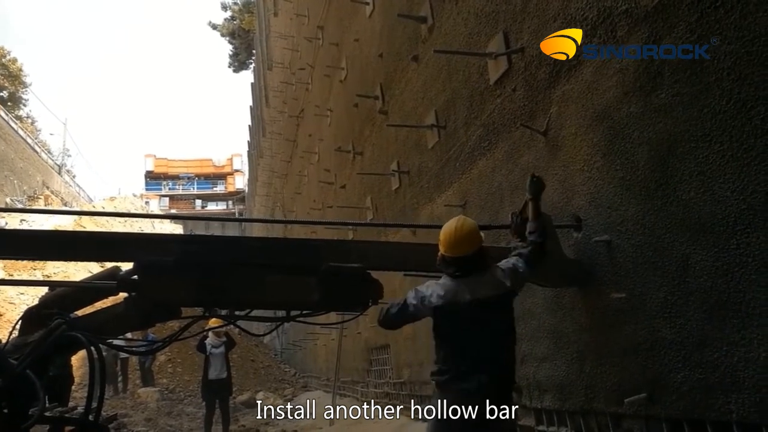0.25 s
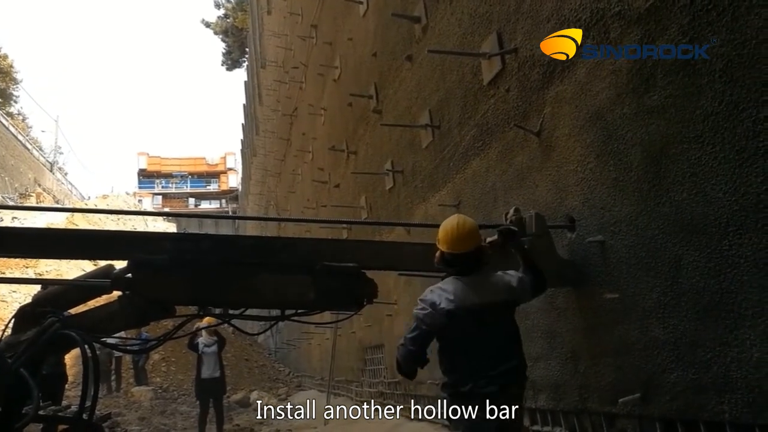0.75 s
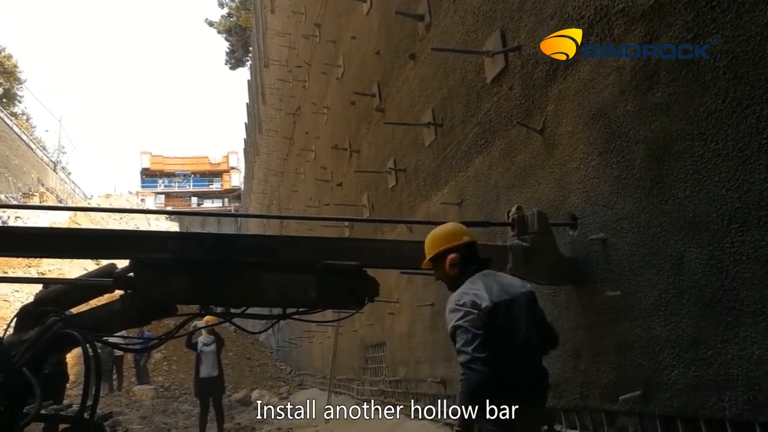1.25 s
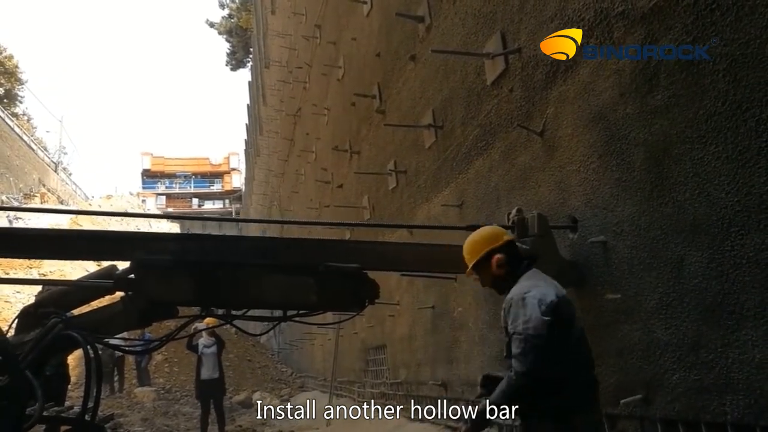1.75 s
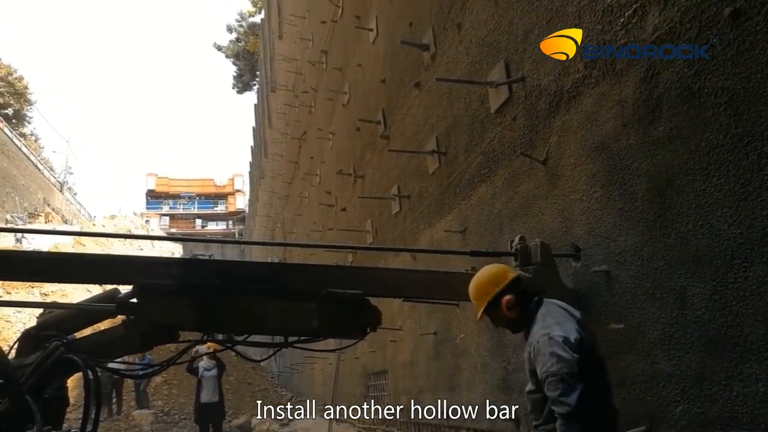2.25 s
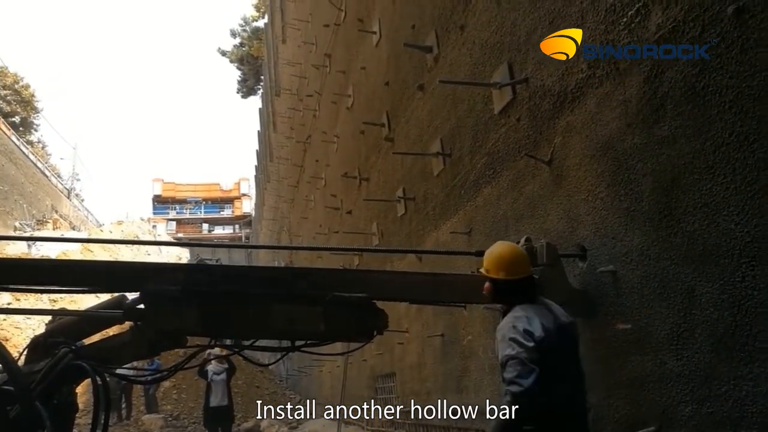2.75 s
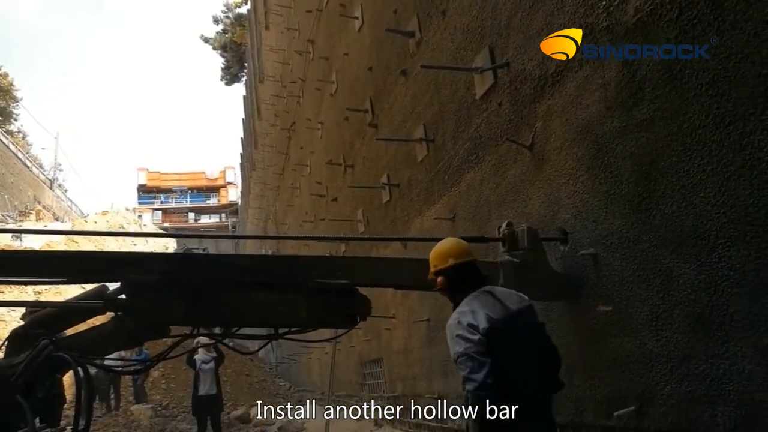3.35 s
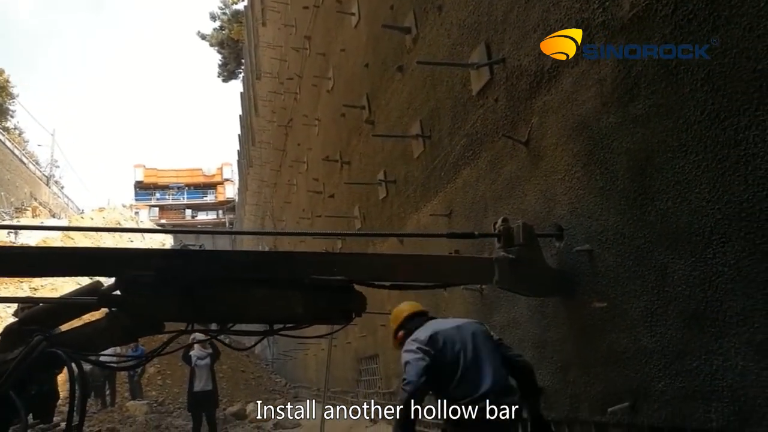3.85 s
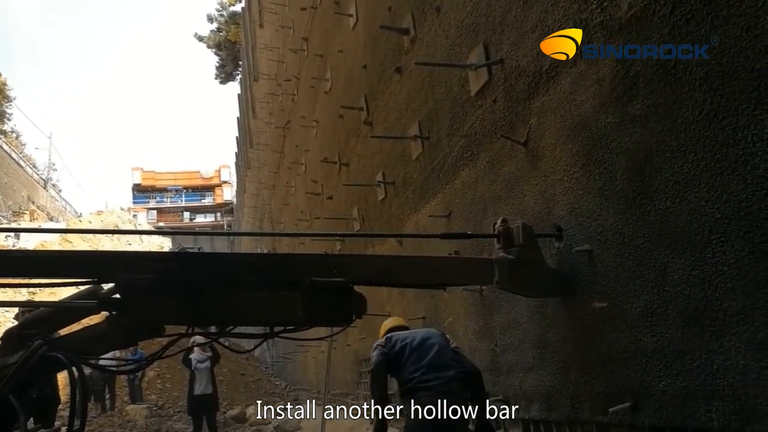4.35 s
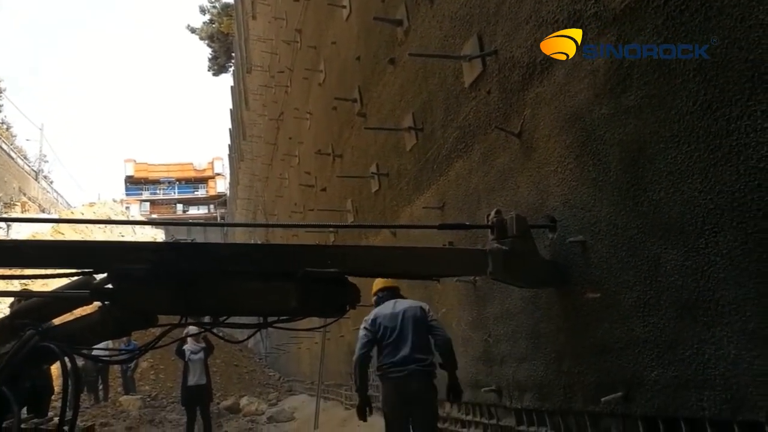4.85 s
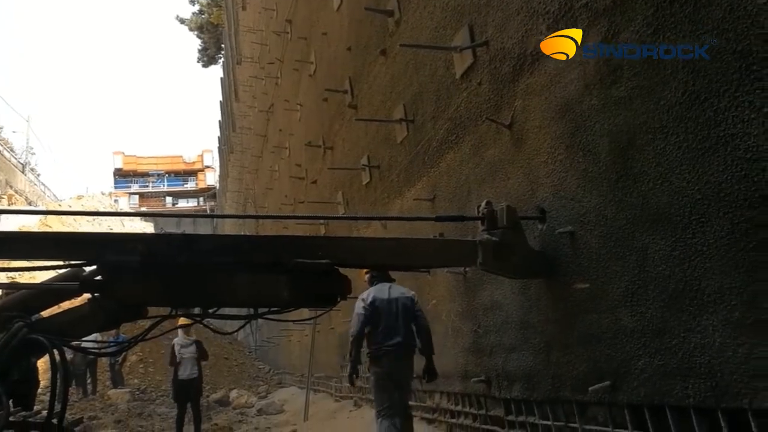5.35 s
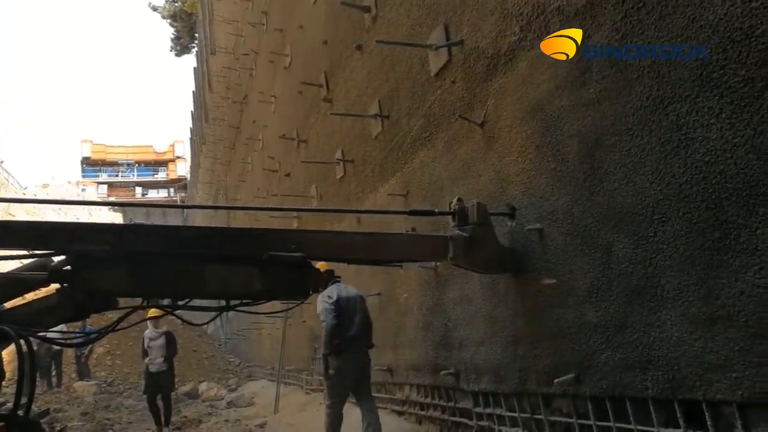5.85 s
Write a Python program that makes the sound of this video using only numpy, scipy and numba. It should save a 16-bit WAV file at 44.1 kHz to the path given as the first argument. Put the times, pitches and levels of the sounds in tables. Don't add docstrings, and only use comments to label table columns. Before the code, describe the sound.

Hissing steel feed with a thin steady whistle, two sharp metal clanks, noisy compressed-air blow-offs with scrapes and squeaks, ending in a long roaring blast.

```python
import sys
import numpy as np
from scipy import signal
from scipy.io import wavfile
from scipy.ndimage import uniform_filter1d
from numba import njit

SR = 44100
rng = np.random.default_rng(int(sys.argv[2]) if len(sys.argv) > 2 else 0)


def natural_amplitude(level_db):
    exponent = np.asarray(level_db, float) / 20
    return 10 ** exponent


def output_pcm(signal):
    pcm = np.clip(np.atleast_2d(signal).T, -1, 1) * 32767
    wavfile.write(sys.argv[1], SR, np.round(pcm).astype(np.int16))


N = 269892


def colour(table, hz):
    f, db = np.transpose(table)
    return np.interp(np.log(hz), np.log(f), db)


@njit
def svf(x, hz, width):
    y, b, l = np.empty(len(x)), 0., 0.
    g = np.tan(np.pi * hz / SR)
    k = 2 * np.pi * width / SR / np.sin(2 * np.pi * hz / SR)
    for i in range(len(x)):
        v = (b + g * (x[i] - l)) / (1 + g * (g + k))
        b, l, y[i] = 2 * v - b, l + 2 * g * v, k * v
    return y


def noise_bands(hz, width, size=N):
    return [svf(rng.standard_normal(size), 1. * hz, 1. * width) for _ in range(2)]


def high(x, hz, order):
    return signal.sosfilt(signal.butter(order, hz, "high", fs=SR, output="sos"), x)


def walk(rate, size=N):
    hold = int(SR / rate)
    steps = np.repeat(rng.standard_normal(size // hold + 1), hold)
    return 1.11 * uniform_filter1d(uniform_filter1d(steps, hold), hold)[:size]


def pair(mid, side, pan_db):
    return np.array([mid + side, mid - side]) * natural_amplitude(np.array([pan_db, -pan_db]) / 2).reshape(2, -1)


def bursts(rows, t):
    power = 0
    for s, rise, hold, fall, db in rows:
        away = np.clip(np.maximum((s - t) / rise, (t - s - hold) / fall), 0, 5)
        power = power + natural_amplitude(db - 20 * away) ** 2
    return power


def tone(rows, wobble, rough_db):
    s, hz, db = np.transpose(rows)
    out, size, first = np.zeros((2, N)), int((s[-1] - s[0]) * SR), int(s[0] * SR)
    t = s[0] + np.arange(size) / SR
    fade = np.clip(np.minimum(t - s[0], s[-1] - t) / 0.028, 0, 1)
    pitch = np.interp(t, s, hz) * (1 + wobble * walk(91.2, size=size))
    phase = 2 * np.pi * np.cumsum(pitch) / SR
    gain = np.sqrt(2) * fade * natural_amplitude(np.interp(t, s, db) + 1.45)
    for port, lead in enumerate((.7, -.7)):
        rough = natural_amplitude(rough_db * walk(40, size=size))
        out[port, first:first + size] = gain * rough * np.sin(phase + lead + .15 * walk(12, size=size))
    return out


# (f/Hz, width/Hz, level/dB, side over mid/dB)
HOUSING = [(102.4, 3.9, -58.5, -24), (126.4, 9.3, -60, -20), (187, 3.5, -59, -24), (285.5, 19, -52, -27),
           (418.3, 15, -53, 0)]


def engine(rumble, load):
    swell = natural_amplitude(load * (np.minimum(10 * np.log10(rumble), -42) + 50))
    out = 0
    for hz, width, db, side_db in HOUSING:
        mid, side = noise_bands(hz, width)
        out = out + natural_amplitude(db) * pair(mid, side * natural_amplitude(side_db), 0.) / mid.std()
    return out * swell


# (t/s, level/dB)
FEED = [(.06, -64), (.28, -42), (.45, -37), (.6, -39), (.94, -33), (1.2, -36.5), (1.35, -33.5),
        (1.63, -31.5), (1.95, -36), (2.08, -40), (2.28, -35), (2.5, -36.5), (2.57, -36.5), (2.63, -33.5),
        (3.2, -40), (3.4, -41.5), (3.798, -44), (4.3, -60)]


def feed(t):
    s, db = np.transpose(FEED)
    return natural_amplitude(np.interp(t, s, db, right=-99)) ** 2


# (t/s, f/Hz, level/dB)
WHISTLE = [
    [(.3, 3500, -44), (.38, 3450, -44), (.49, 3498, -37), (.6, 3465, -38.5), (.78, 3482, -34),
     (.92, 3435, -37)],
    [(.92, 3415, -33), (1.05, 3395, -33.5)],
    [(1.07, 3612, -45), (1.4, 3605, -44), (1.53, 3582, -39), (1.76, 3578, -41), (1.955, 3590, -38)],
    [(1.965, 3630, -39), (2.04, 3640, -42)],
    [(2.26, 3596, -43), (2.32, 3606, -36), (2.44, 3620, -37), (2.5, 3610, -45)],
]


def whistle():
    return sum(tone(rows, wobble=.003, rough_db=1.6) for rows in WHISTLE)


# (start t/s, end t/s, start f/Hz, end f/Hz, level/dB)
LEAKS = [
    (.3, .52, 8140, 7900, -42),
    (.92, 1.14, 8000, 7920, -41),
    (1.48, 1.75, 11836, 11845, -38.5),
    (2.134, 2.34, 7800, 8150, -46),
    (3., 3.1, 9400, 9150, -29),
]


def leaks():
    out = 0
    for start, end, start_hz, end_hz, db in LEAKS:
        glide = [(start, start_hz, db - 7), (end, end_hz, db - 8.5)]
        out = out + tone(glide, wobble=.003, rough_db=5.5)
    return out


# (t/s at full strength, rise/s, hold/s, fall/s, level/dB)
GUSTS = [
    (.75, 0.42, 0.073, .3, -50),
    (1.21, 0.39, 0.016, 0.22, -46.5),
    (5.05, .05, 0.018, 0.071, -44),
    (5.24, 0.085, .01, 0.45, -36.5),
    (5.42, .05, 0.011, .05, -42),
    (5.66, 0.072, 0.013, 0.11, -35.5),
]


def gusts(t):
    return bursts(GUSTS, t)


# (t/s, peak level/dB, decay/s, centre f/Hz, width/Hz)
SPITS = [(2.51, -16.5, 0.025, 6060, 10000), (2.611, -25, 0.049, 2200, 5000),
         (3.853, -22.5, 0.018, 1300, 2480), (4.07, -24, 0.023, 900, 1800), (4.48, -28, 0.096, 2880, 6450),
         (4.625, -20.5, 0.037, 2870, 5000), (4.679, -30, 0.061, 327, 200), (5.026, -8.5, 0.013, 3700, 4700),
         (5.218, -13, 0.015, 800, 1600), (0.718, -26, 0.025, 3500, 3600), (5.01, -27, 0.046, 190, 200),
         (5.23, -24.5, 0.062, 141, 200), (5.016, -19, 0.059, 35.8, 16), (5.585, -16, 0.021, 500, 1200),
         (5.49, -22, .015, 400, 900), (5.78, -26, .015, 400, 1200)]


def spits():
    out, t = np.zeros((2, N)), np.arange(SR // 3) / SR
    for s, db, decay, hz, width in SPITS:
        mid, side = noise_bands(hz, width, len(t))
        shape = (1 - np.exp(-t / 0.001)) * np.exp(-t / decay)
        first = int(s * SR)
        out[:, first:first + len(t)] += pair(mid, side, -1) * shape * natural_amplitude(db) / (2 * mid.std())
    return out


# (t/s, level/dB)
CLANKS = [
    (2.511, -25),
    (2.612, -21.5),
]
# (f/Hz, level/dB, t60/s)
CLANK_MODES = [
    [(5780, -8, .1), (8452, -18, .11), (9620, -11, .05), (11200, 1, .12), (13540, -1, .075)],
    [(3700, -2.5, 0.17), (3500, -3, 0.24), (5222, -6.5, 0.42), (7354, -15, 0.25), (10400, -10, .11),
     (13000, -17, .15)],
]


def clanks():
    out, t = np.zeros((2, N)), np.arange(SR // 3) / SR
    ports = np.array([[.11], [-.11]])
    for (s, level_db), modes in zip(CLANKS, CLANK_MODES):
        first = int(s * SR)
        for hz, db, t60 in modes:
            decay = np.exp(-np.log(1000) * t / t60)
            ring = np.sin(2 * np.pi * (hz * t + rng.random() + ports)) * decay
            out[:, first:first + len(t)] += natural_amplitude(level_db + db) * ring
    return out


# (t/s at full strength, rise/s, hold/s, fall/s, level/dB)
BLOW_OFFS = [
    (2.77, 0.096, 0.37, 0.23, -21.5),
    (3.2, 0.13, 0.084, 0.19, -27.5),
    (3.91, .1, .01, 0.4, -28.5),
    (4.07, 0.057, .02, 0.7, -35),
    (4.5, 0.037, 0.096, .1, -41),
    (4.634, 0.16, 0.0074, 0.15, -29),
    (5.02, 0.093, .01, 0.11, -21),
]


def blow_offs(t):
    return bursts(BLOW_OFFS, t)


# (t/s at full strength, rise/s, hold/s, fall/s, level/dB)
SCRAPES = [
    (3.864, 0.037, 0.053, 0.26, -36.5),
    (4.064, 0.034, 0.017, 0.25, -36),
    (4.7, 0.098, 0.032, 0.12, -37.5),
    (5.24, .15, .01, 0.37, -35.5),
    (5.6, 0.34, 0.035, 0.16, -30),
]


def scrapes(t):
    return bursts(SCRAPES, t)


# (t/s, f/Hz, level/dB)
SQUEAKS = [
    [(4.04, 3720, -44), (4.11, 3690, -36), (4.15, 3560, -39)],
    [(4.12, 3420, -37), (4.16, 3250, -34), (4.215, 3050, -37)],
    [(4.555, 3850, -38), (4.59, 3800, -28), (4.62, 3690, -29.5), (4.68, 3430, -33)],
    [(4.57, 3250, -45), (4.66, 3100, -44)],
    [(4.6, 5050, -37), (4.67, 4950, -38)],
]


def squeaks():
    return sum(tone(rows, wobble=.014, rough_db=2.5) for rows in SQUEAKS)


# (t/s at full strength, rise/s, hold/s, fall/s, level/dB)
ROAR = [
    (5.02, 0.061, .05, 0.062, -29),
    (5.14, 0.18, 0.96, .1, -24.5),
]


def roar(t):
    return bursts(ROAR, t)


def jet():
    mid, side = noise_bands(15500, 1200)
    level = natural_amplitude(-30 + 1.5 * walk(17))
    fade_in = np.clip((np.arange(N) / SR - 6.5) / .04, 0, 1)
    return pair(mid, side, -1.5) / mid.std() * level * fade_in


WORK_MIX = {"feed": (0, -3, -10.5, -19), "blow": (-0.5, -12, -24, -57), "scrape": (-12, 0, -1, -28),
            "roar": (0.5, -7.5, -11, -19), "gust": (-40, -40, 0, 3.5)}


def work():
    idle_air_db, idle_buffet_db = -53, -66
    rig_pan_db, roar_pan_db = -.5, -3
    t = np.arange(0, N / SR + .002, .001)
    drive = {"feed": feed(t), "blow": blow_offs(t), "scrape": scrapes(t), "roar": roar(t), "gust": gusts(t)}
    power = sum(np.outer(natural_amplitude(WORK_MIX[kind]) ** 2, p) for kind, p in drive.items())
    power[0] += natural_amplitude(idle_air_db) ** 2 * (t > FEED[1][0])
    power[3] += natural_amplitude(idle_buffet_db) ** 2
    pan_db = rig_pan_db + (roar_pan_db - rig_pan_db) * drive["roar"] / sum(drive.values())
    return [np.interp(np.arange(N) / SR, t, curve) for curve in (*power, pan_db)]


# (f/Hz, level/dB per Hz)
AIR = [(880, -34), (1500, -14), (2080, 2), (2390, -2), (4830, -1), (5660, 0.5), (9650, -1.5), (11700, -5),
       (15100, -3.5), (16000, -7.5)]
DRAG = [(500, -46), (800, 0), (1200, 1.5), (2000, -1.5), (2800, -9.5), (4000, 3.5), (6000, -63)]
RUMBLE = [(70, -15), (120, -1.5), (200, -1.5), (300, 1.5), (430, -3), (620, -7), (780, -3.5), (1000, -21.5)]
BUFFET = [(20, -12), (36, 5), (55, -12), (85, -2), (140, -38.5)]
SITE = [(15, -55), (25, -10), (97, -8), (127, 1), (229, -17), (416, -16), (607, -15), (818, -17),
        (4370, -18), (5730, -9), (7310, -18.5), (10100, -8.5), (16000, -23.5)]
# (f/Hz, side over mid level/dB)
WIDTH = [(150, -26), (400, 3), (650, 3.5), (1400, .5), (3000, 0), (15000, 0)]
# (f/Hz, left minus right level/dB)
LEAN = [(120, -1.5), (500, 0.5), (1000, -0.5), (2000, -1.7), (4000, 2.5), (8000, 0)]


def rush(layers, pan_db, flutter_db, own_db, grit_db):
    site_db = -43.5
    centres = 22 * 2 ** np.arange(0, 9.8, 1 / 3)
    shapes = [natural_amplitude(colour(t, centres)) ** 2 * centres for t in (AIR, DRAG, RUMBLE, BUFFET, SITE)]
    powers = [*layers, natural_amplitude(site_db) ** 2]
    flutter, grit = walk(14), walk(300)
    out = 0
    for k, hz in enumerate(centres):
        power = sum(p * (shape[k] / shape.sum()) for p, shape in zip(powers, shapes))
        motion_db = flutter_db * flutter + own_db * walk(9) + grit_db * grit * min(hz / 1000, 1)
        gain = np.sqrt(power) * natural_amplitude(motion_db)
        mid, side = (svf(band, hz, hz / 2.8) for band in noise_bands(hz, hz / 2.8))
        out = out + gain * pair(mid, side * natural_amplitude(colour(WIDTH, hz)), colour(LEAN, hz)) / mid.std()
    return out * natural_amplitude(np.array([pan_db, -pan_db]) / 2)


def patches(shape, count):
    field = uniform_filter1d(rng.standard_normal(shape), size=count[0], axis=0)
    field = uniform_filter1d(field, size=count[1], axis=1)
    return field / field.std()


def mottle(x, patchy_db, hole_db, hole_edge):
    hz, _, z = signal.stft(x, SR, nperseg=1024)
    depth = np.clip(hz / 700, .5, 1)[:, None]
    holes = np.clip(3 * (patches(z.shape[1:], count=(5, 4)) - hole_edge), 0, 1)
    gain = natural_amplitude(depth * (patchy_db * patches(z.shape[1:], count=(2, 7)) + hole_db * holes))
    usual = np.sqrt(uniform_filter1d(np.mean(gain ** 2, axis=1), size=40))[:, None]
    return signal.istft(z * gain / usual, SR, nperseg=1024)[1][:, :N]


def scene():
    *layers, pan_db = work()
    noise = engine(layers[2], load=0.48) + jet()
    noise = noise + rush(layers, pan_db, flutter_db=0.66, own_db=1.06, grit_db=0.74)
    noise = mottle(noise, patchy_db=3., hole_db=-36, hole_edge=1.83)
    return noise + whistle() + leaks() + spits() + clanks() + squeaks()


def top_cut(x):
    return signal.sosfilt(signal.butter(12, 16970, fs=SR, output="sos"), x)


def record(dry):
    ports_hz, leak_hz, leak_db = 240, 120, 8
    dropout_s, dropout_db, dropout_hz = (2.58, 2.6105), (-12, -21), 400
    side = (dry[0] - dry[1]) / 2
    thin = high(high(side, ports_hz, order=4)[::-1], ports_hz, order=4)[::-1]
    blast = uniform_filter1d(side ** 2, size=8000)
    gust = np.clip(1.54 * walk(14) - 2.2 + 3.35 * np.sqrt(blast / blast.max()), 0, 1)
    side = thin + high(side - thin, leak_hz, order=3) * natural_amplitude(leak_db) * gust
    x = pair(dry.mean(axis=0), side, 0.)
    t = np.arange(N) / SR
    gap = uniform_filter1d(((t > dropout_s[0]) & (t < dropout_s[1])) * 1., size=40)
    bass = signal.sosfiltfilt(signal.butter(2, dropout_hz, fs=SR, output="sos"), x)
    x = bass + (x - bass) * natural_amplitude(np.interp(t, dropout_s, dropout_db) * gap)
    x = signal.sosfilt(signal.ellip(12, .3, 75, 15950, fs=SR, output="sos"), x)
    return top_cut(x)


dry = scene()
out = record(dry)
output_pcm(out)
```